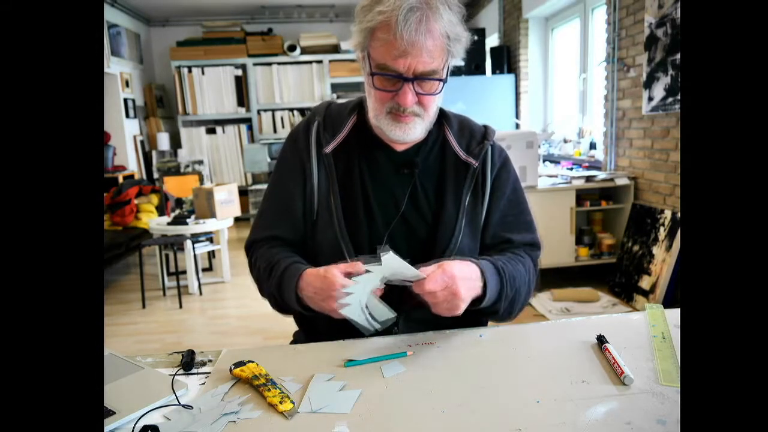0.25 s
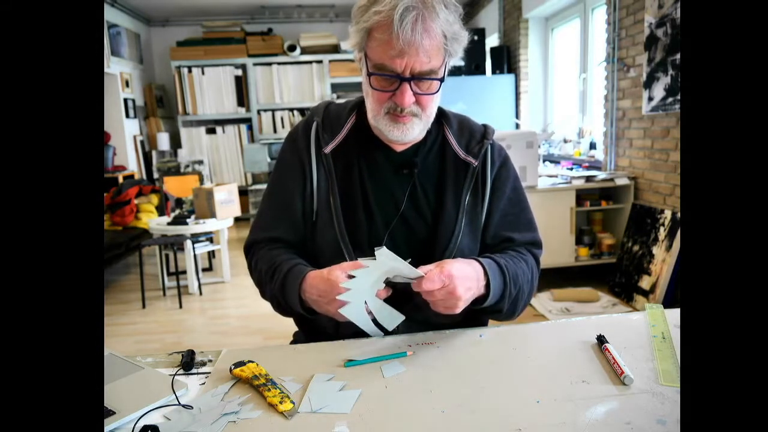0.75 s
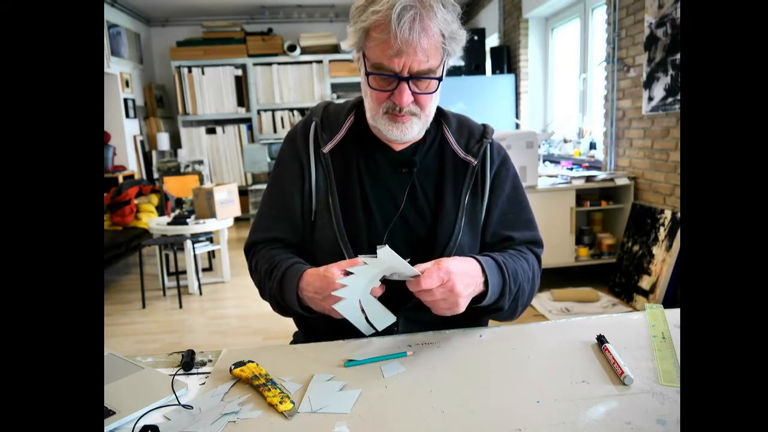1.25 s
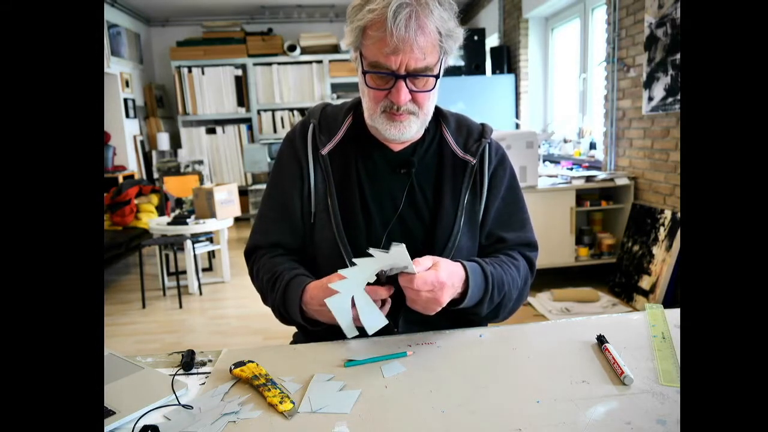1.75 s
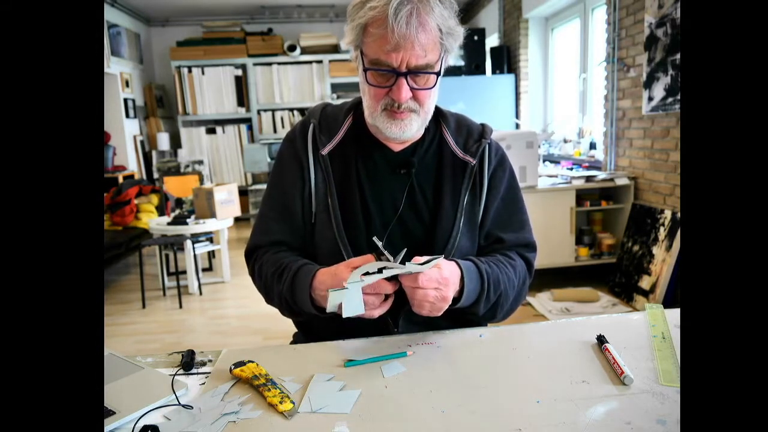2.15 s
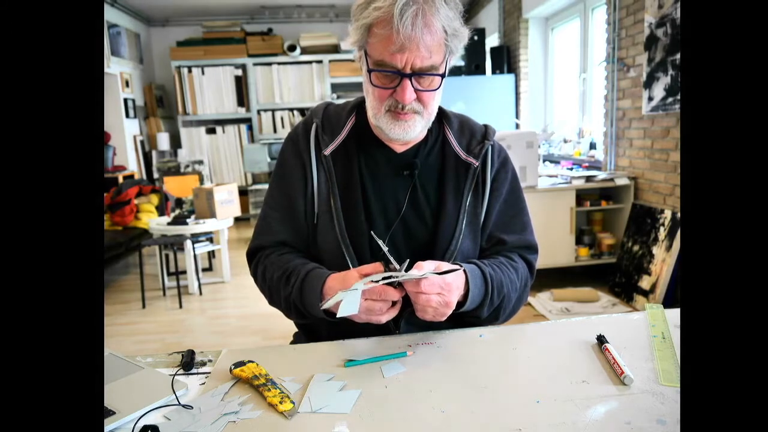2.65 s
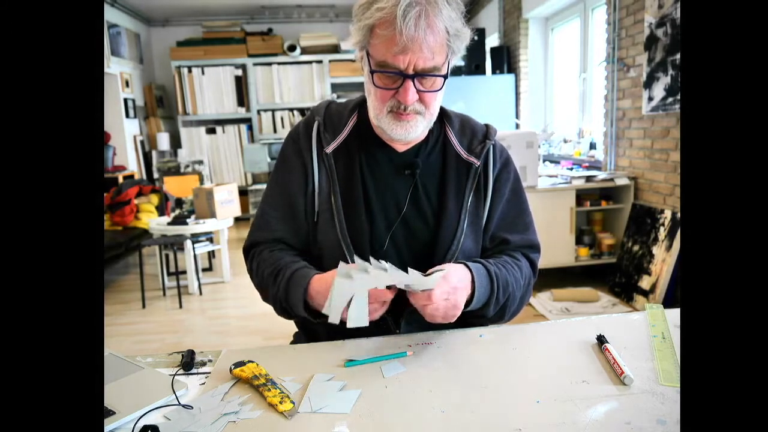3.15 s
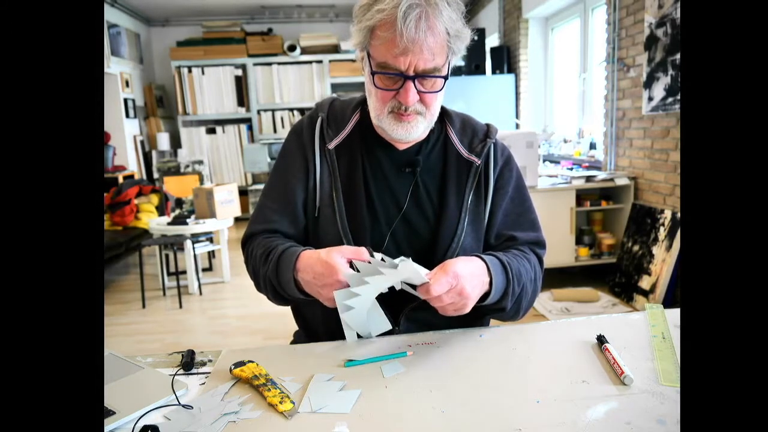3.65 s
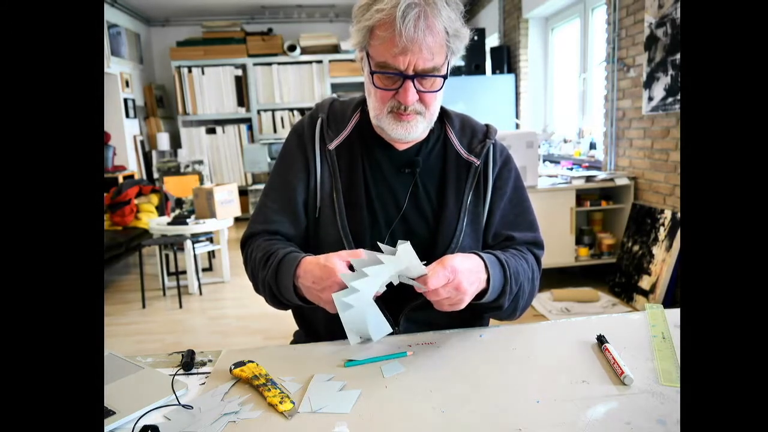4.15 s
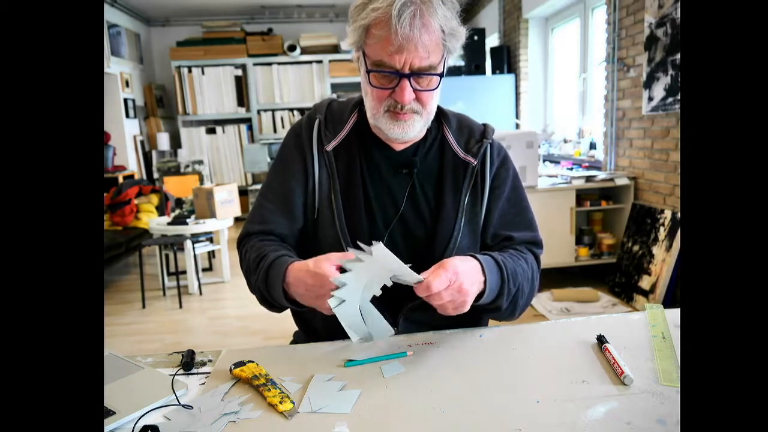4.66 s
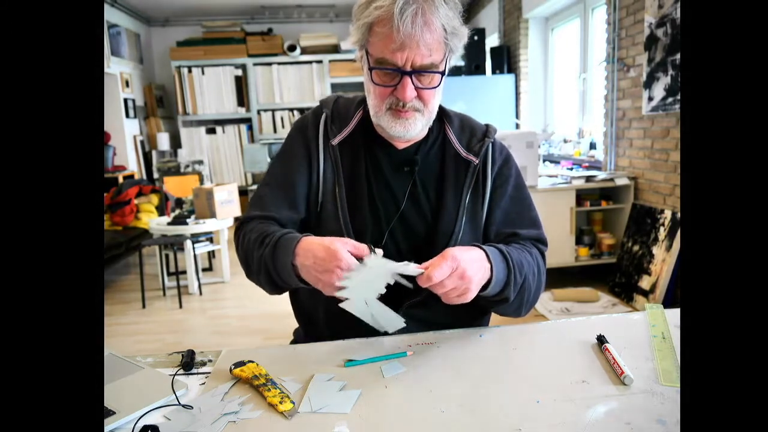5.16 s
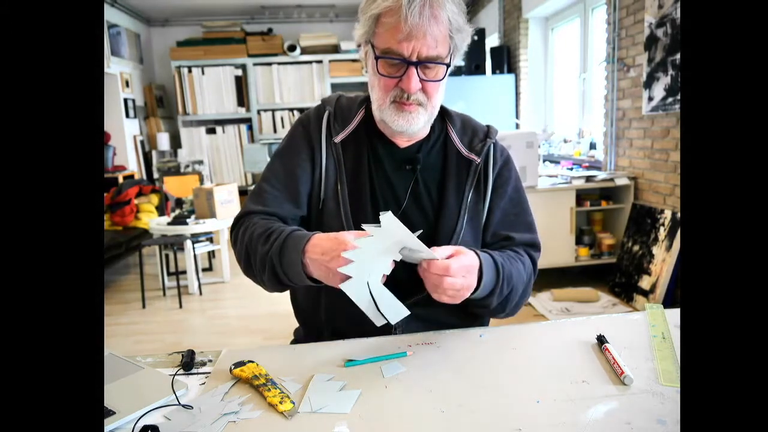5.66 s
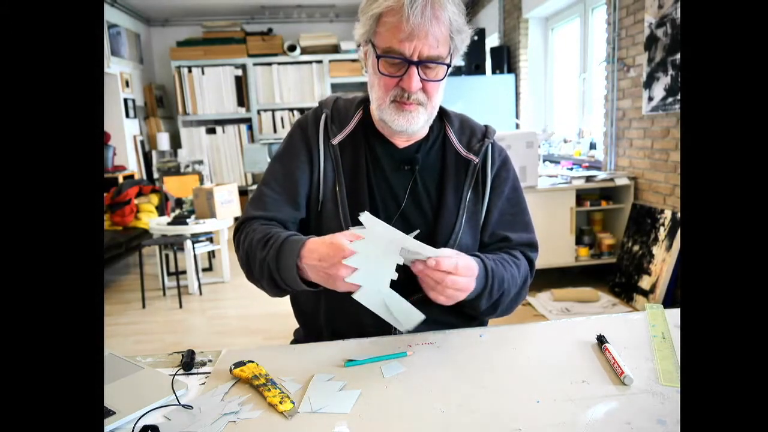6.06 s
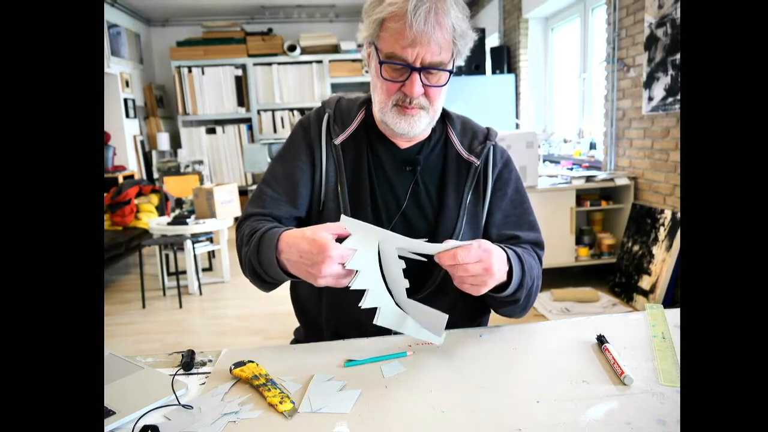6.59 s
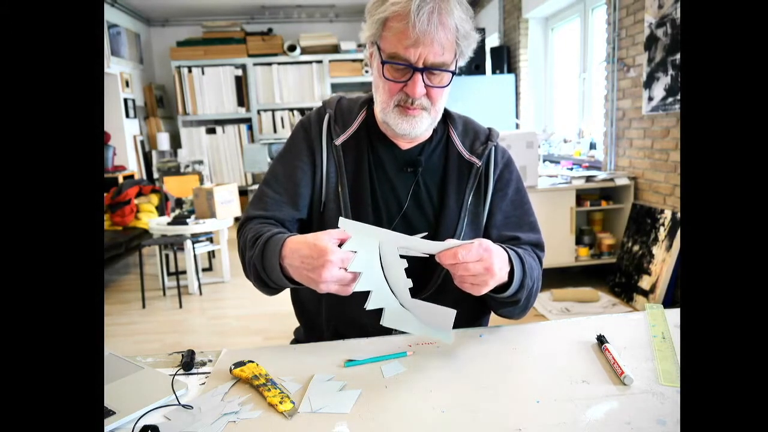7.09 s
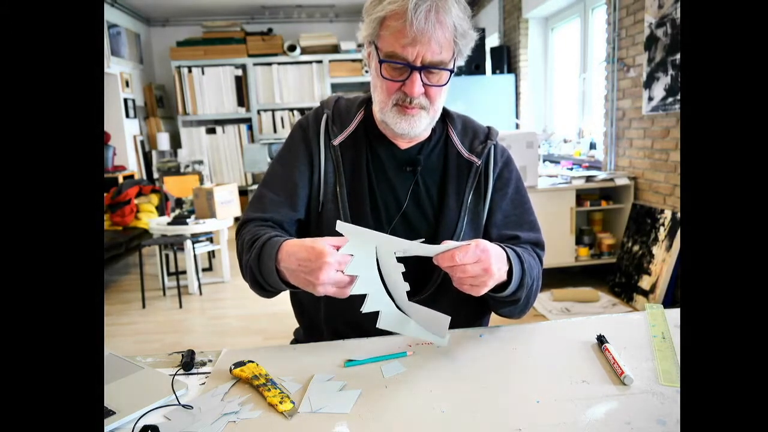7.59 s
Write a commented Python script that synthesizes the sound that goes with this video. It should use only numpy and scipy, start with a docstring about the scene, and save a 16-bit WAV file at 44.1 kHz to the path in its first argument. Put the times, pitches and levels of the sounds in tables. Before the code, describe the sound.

Stiff card rustles and scrapes as it is turned by hand, with short, crisp scissor cuts and light blade ticks.

```python
"""Scissors cut a folded sheet of stiff white card, close by, at a table in a quiet studio.
The blades crunch through in runs of small snaps: fibres fracture, and the freed sheet springs back
in its bending modes with a short hollow pock. Between the cuts the card is turned and slides through
the fingers in short strokes of stick-slip friction, and the blades tick together.
A faint, dull low noise swells and fades over the still air of the room."""
import sys
import numpy as np
from scipy import signal
from scipy.fft import rfft, irfft
from scipy.io import wavfile

SR = 44100
rng = np.random.default_rng(int(sys.argv[2]) if len(sys.argv) > 2 else 0)


def master_out(mix):
    """Clip the mix to full scale and print it as 16-bit PCM to the path in sys.argv[1]."""
    frames = np.transpose(np.atleast_2d(mix))
    ceiling = np.clip(frames, -1, 1)
    pcm = np.round(ceiling * 32767).astype(np.int16)
    wavfile.write(sys.argv[1], SR, pcm)


N = 345303


def amp(db):
    """Amplitude ratio of a level in decibels."""
    return 10 ** (np.asarray(db) / 20)


def unit(x):
    """Normalisation to an rms of 1."""
    return x / np.sqrt(np.mean(x ** 2) + 1e-20)


def at_level(x, db, span_s=.009):
    """Equal energy: a transient gets the energy of level db held for span_s."""
    return x * amp(db) * np.sqrt(span_s * SR / (np.sum(x ** 2) + 1e-20))


def spectrum_at(points, hz):
    """Interpolation on a logarithmic frequency axis."""
    knots_hz, values = np.transpose(points)
    return np.interp(np.log(hz + 1), np.log(knots_hz + 1), values)


def add(mix, start_s, sound):
    """Superposition of a sound on the mix."""
    part = mix[max(round(start_s * SR), 0):][:len(sound)]
    part += sound[:len(part)]


def resonance(hz, centre_hz, width_hz):
    """A Lorentzian peak of height 1."""
    return 1 / (1 + (2 * (hz - centre_hz) / width_hz) ** 2)


def coloured_noise(gain, size):
    """Spectral shaping of white noise, at an rms of 1."""
    return unit(irfft(rfft(rng.standard_normal(size)) * gain, size))


def minimum_phase(x, gain):
    """Causal filtering: the phase follows from the log gain by the Hilbert transform."""
    log_response = np.conj(signal.hilbert(np.log(gain + 1e-4)))
    return np.fft.ifft(np.fft.fft(x) * np.exp(log_response)).real


def waver(per_s):
    """Random modulation of rms 1, interpolated between per_s values a second."""
    knots = np.arange(0, N, SR / per_s)
    return unit(np.interp(np.arange(N), knots, rng.standard_normal(N)[:len(knots)]))


def fibres(size, per_s, spread_db):
    """Shot noise of fibres catching or breaking: many small impulses, a few large."""
    occurs = rng.random(size) < per_s / SR
    strength = rng.standard_normal(size)
    return occurs * strength * amp(spread_db * np.minimum(rng.exponential(1, size), 4))


# Spectrum of the still air. Each row: frequency in Hz, relative level in dB.
AIR_SPECTRUM = [(30, -24.5), (120, -4.5), (280, -1.5), (450, -7.5), (1000, -12), (2500, -16), (4500, -24.5),
                (7000, -24.5), (11000, -32), (15000, -49)]
def air(level_db=-75):
    """Stationary noise: the faint ambient sound of the room."""
    hz = np.fft.rfftfreq(N, 1 / SR)
    return amp(level_db) * coloured_noise(amp(spectrum_at(AIR_SPECTRUM, hz)), N)


# Reflections from the table and the body. Each row: delay in seconds, gain.
ECHOES = [(.0017, 0.28), (.0031, -0.18), (.0078, 0.072), (0.0107, -.11), (0.011, 0.054)]
# Decay of the studio. Each row: frequency in Hz, time to fall 60 dB in seconds.
STUDIO_T60 = [(150, 0.11), (900, 0.15), (4000, 0.11), (12000, 0.015)]
def studio(x, tail_db, build_s=0.11, size=16384):
    """Reverberation: early reflections, then a short weak tail whose treble is absorbed first."""
    hz, t, noise = signal.stft(rng.standard_normal(size), SR, nperseg=256)
    decay = amp(-60 * t / spectrum_at(STUDIO_T60, hz)[:, None])
    tail = signal.istft(noise * decay * (1 - np.exp(-t / build_s)), SR)[1]
    response = amp(tail_db) * tail / np.linalg.norm(tail)
    for delay, gain in ECHOES:
        add(response, delay, np.array([gain]))
    return x + signal.oaconvolve(x, response)[:N]


# Swells of the low murmur. Each row: time in seconds, level in dB.
MURMUR_LEVELS = [(0.0, -97), (0.5, -82), (0.67, -64.5), (1.59, -77), (1.79, -60.5), (2.22, -69.5),
                 (3.16, -58), (3.66, -70.5), (4.17, -58.5), (4.51, -72.5), (4.99, -64.5), (5.34, -65.5),
                 (5.76, -77), (6.1, -59), (6.76, -82), (7.24, -68.5), (7.59, -75), (7.83, -66)]
def low_murmur(centre_hz=290, width_hz=240):
    """Amplitude modulation of a noise band: a faint, dull low noise that swells and fades."""
    hz, t = np.fft.rfftfreq(N, 1 / SR), np.arange(N) / SR
    murmur = coloured_noise(resonance(hz, centre_hz, width_hz) * hz / (hz + centre_hz), N)
    return murmur * amp(np.interp(t, *np.transpose(MURMUR_LEVELS)))


# The smooth face of the card glides over skin.
# Each row: start and length in seconds, highest level in dB, pitch in Hz.
SWISHES = [(1.633, 0.34, -57, 10800), (3.911, 0.33, -59.5, 10800), (4.323, .1, -55, 10100),
           (4.603, 0.069, -58.5, 11500), (4.908, .12, -53, 10300), (5.409, 0.15, -56.5, 9800),
           (5.973, 0.4, -57, 10640)]
def swishes(width_hz=2000, arch=0.85):
    """Very fine slips excite one high resonance, whose amplitude follows the speed of the glide."""
    out, hz = np.zeros(N), np.fft.rfftfreq(SR, 1 / SR)
    for start, length, db, pitch_hz in SWISHES:
        slips = coloured_noise(resonance(hz, pitch_hz, width_hz) ** 2, SR)
        speed = np.abs(np.sin(np.pi * np.arange(0, length, 1 / SR) / length)) ** arch
        add(out, start, amp(db) * speed * slips[:len(speed)])
    return out


# Radiation of the sheet. Each row: frequency in Hz, relative level in dB.
CARD_SPECTRUM = [(40, -28), (150, -28), (320, 3.5), (500, -6), (900, -1), (1900, -0.5), (2900, -4.5),
                 (4900, 0), (6200, -10), (7200, 0.5), (8700, -3.5), (9800, 0.5), (11300, -0.5),
                 (12600, -11), (14400, -17.5), (15800, -34)]
# Narrow resonances of card and blades. Each row: centre and width in Hz, added peak's gain in dB.
RESONANCES = [(320, 22, 3.5), (396, 21, -14.5), (647, 70, 5), (907, 110, 2.5), (2006, 79, 2),
              (4170, 670, -11), (4900, 200, -13)]
# Edges in Hz of three bands: body, scrape and hiss in a rub; flex, crack and fizz in a snap.
BAND_EDGES_HZ = [35, 1900, 6000, 15500]
def card_bands(hz):
    """Frequency response of the sheet, split into three bands by Butterworth slopes."""
    peaks = sum(amp(db) * resonance(hz, centre, width) for centre, width, db in RESONANCES)
    colour = amp(spectrum_at(CARD_SPECTRUM, hz)) * (1 + peaks)
    return [colour / np.sqrt((1 + (low / (hz + 1)) ** 12) * (1 + (hz / high) ** 12))
            for low, high in zip(BAND_EDGES_HZ, BAND_EDGES_HZ[1:])]


# Faint rustle between the strokes. Each row: time in seconds, level in dB.
RUSTLE = [(0, -101), (.4, -77), (.7, -61.5), (1.1, -71.5), (1.45, -69), (1.9, -64.5), (2.15, -70.5),
          (2.8, -57.5), (3.4, -68.5), (3.8, -66), (4.2, -66.5), (4.45, -59.5), (5.15, -54.5), (5.45, -64.5),
          (5.8, -71.5), (6.3, -67.5), (6.85, -78), (7.1, -68), (7.83, -73.5)]
# Offsets of that level in dB for the body, scrape and hiss bands.
RUSTLE_BANDS_DB = (-1, -13, -16)
# Strokes of card on skin and steel. Each row: start, attack, hold and release in seconds,
# body, scrape and hiss levels in dB, body and scrape resonances in Hz.
STROKES = [(0.157, 0.0035, 0.058, 0.03, -51, -64, -63.5, 1237, 1970),
           (0.601, 0.0073, 0.054, 0.052, -42, -45.5, -46, 803, 4900),
           (1.155, 0.052, 0.0079, 0.02, -65.5, -59, -57.5, 620, 4760),
           (1.46, 0.04, 0.017, 0.043, -65, -52.5, -54.5, 2040, 4250),
           (1.608, .006, .04, .09, -49, -56.5, -50.5, 1096, 4300),
           (1.667, 0.054, .035, 0.12, -50, -56.5, -53.5, 1700, 2000),
           (1.903, 0.048, 0.044, 0.031, -45.5, -46.5, -52, 1530, 2378),
           (2.04, 0.0057, 0.0087, 0.027, -45, -48, -54.5, 1500, 2158),
           (2.174, 0.038, 0.0092, 0.045, -66.5, -64.5, -74, 900, 4330),
           (2.281, 0.033, 0.015, 0.012, -59, -59, -65, 890, 4430),
           (2.353, 0.073, 0.034, 0.034, -44, -49, -56, 999, 4365),
           (2.543, 0.0026, .12, .05, -56.5, -67.5, -64, 730, 3920),
           (2.84, 0.015, 0.0059, 0.022, -46, -47.5, -51, 597, 3760),
           (2.943, 0.064, 0.071, .1, -42, -44.5, -50, 1050, 4210),
           (3.185, .022, .038, 0.042, -32, -38.5, -48.5, 1149, 4700),
           (3.229, 0.021, 0.081, 0.069, -43, -46, -54, 515, 1958),
           (3.397, 0.047, 0.016, 0.057, -49.5, -49, -55, 872, 5024),
           (3.523, 0.1, 0.042, 0.062, -43.5, -44.5, -47.5, 1560, 3920),
           (3.849, 0.18, 0.12, .05, -66.5, -69.5, -66.5, 1000, 4390),
           (4.04, 0.0087, 0.18, 0.11, -51.5, -61.5, -59.5, 754, 2885),
           (4.27, .008, .025, .04, -67, -59.5, -67, 900, 4200),
           (4.325, 0.012, .035, .055, -58.5, -53.5, -51.5, 846, 4700),
           (4.391, .03, .012, 0.014, -56, -54, -63, 1100, 2900),
           (4.46, 0.0062, 0.096, 0.11, -69, -61, -71, 549, 5200),
           (4.617, 0.0067, 0.038, 0.03, -58, -58.5, -61.5, 1440, 4230),
           (4.687, 0.019, 0.057, 0.036, -54, -46, -47, 691, 5190),
           (4.77, 0.019, .06, 0.15, -45.5, -63.5, -68.5, 785, 1990),
           (4.878, 0.073, 0.026, 0.039, -45.5, -47, -53.5, 744, 4860),
           (5.206, 0.042, 0.059, .035, -52, -56.5, -61, 830, 4616),
           (5.416, 0.038, 0.039, 0.069, -62, -58, -51.5, 529, 5370),
           (5.557, 0.0039, 0.013, 0.079, -70.5, -52.5, -50, 867, 4150),
           (5.652, 0.065, 0.019, 0.029, -51, -52, -49, 1010, 3550),
           (5.851, 0.011, 0.12, 0.08, -59, -58, -58.5, 570, 4230),
           (5.953, 0.0082, 0.046, 0.19, -43.5, -48.5, -49.5, 522.6, 2530),
           (6.069, 0.07, 0.035, 0.052, -56, -56.5, -54.5, 1900, 2192),
           (6.214, 0.044, 0.077, 0.025, -49, -53, -54, 1235, 1960),
           (6.37, 0.015, 0.045, 0.04, -68, -65, -69, 1200, 3895),
           (6.455, 0.028, 0.0042, 0.046, -56.5, -57, -63, 1865, 2080),
           (6.79, 0.0045, 0.0037, 0.041, -56, -52, -54, 1842, 2334),
           (7.101, 0.00294, .032, .05, -55.5, -64, -60, 1500, 4320),
           (7.234, 0.026, 0.086, 0.086, -64.5, -86, -72.5, 1663, 4360),
           (7.592, .033, 0.0092, 0.071, -54, -56, -56, 1400, 5590),
           (7.661, .1, .015, 0.077, -49.5, -51.5, -49, 703, 4000),
           (7.736, .03, .014, .012, -48.5, -46, -46.5, 1500, 5200)]
def handling(hiss_hz=10300, attack_curve=0.94, release_db=-20):
    """Incoherent sources add in power: level and resonance of each band of rubbing over time."""
    t = np.arange(0, N / SR, .001)
    columns = np.transpose(STROKES)
    start, attack, hold, release = columns[:4, :, None]
    band_gains, pitches_hz = amp(columns[4:7]), columns[7:]
    rise = np.clip((t - start) / attack, 0, 1) ** attack_curve
    envelopes = rise * amp(release_db * np.maximum(t - start - attack - hold, 0) / release)
    rustle = amp(np.interp(t, *np.transpose(RUSTLE)) + np.array(RUSTLE_BANDS_DB)[:, None])
    levels = 10 * np.log10(band_gains ** 2 @ envelopes ** 2 + rustle ** 2)
    strongest = np.argmax(envelopes * band_gains[0][:, None], axis=0)
    body_hz, scrape_hz = pitches_hz[:, strongest]
    return t, levels, (body_hz, scrape_hz, np.full(len(t), hiss_hz))


# Treble dips where the curved sheet radiates poorly. Each row: centre and width in Hz.
DIPS = [(6150, 900), (8400, 900)]
# Their depth as the card is turned. Each row: time in seconds, depth in dB.
DIP_DEPTH = [(.6, 2), (1.5, 9), (1.64, -1), (1.95, 2.5), (2.42, 6.5), (3, -1.5), (3.45, 0), (4.1, 0),
             (4.38, 9.5), (4.72, -2), (4.96, 9.5), (5.48, 0), (5.72, 11), (6, -1), (6.8, 8.5), (7.7, 0.5)]
def sliding(bend_octaves=0.047, judder_db=2.12, patch_db=3.0, grip_db=1.0,
            grip_widths_hz=(500, 1000, 3000), brighten=(.08, .08, .3), neutral_db=-54, trim_db=.1):
    """Stick-slip friction under a juddering hand drives a sheet whose resonances drift as it bends."""
    times, levels, centres_hz = handling()
    t, out = np.arange(N) / SR, np.zeros(N)
    bend = 2 ** (bend_octaves * waver(per_s=14))
    judder = amp(judder_db * waver(per_s=89))
    smoothing = np.outer(np.hanning(9), np.hanning(21))
    for band, level in enumerate(levels):
        slips = fibres(N, per_s=14000, spread_db=2.5) * judder
        bins_hz, frame_s, spectra = signal.stft(slips, SR, nperseg=512)
        hz = bins_hz[:, None]
        # the timbre flickers in random patches of time and frequency
        patches = unit(signal.fftconvolve(rng.standard_normal(spectra.shape), smoothing, "same"))
        bent_hz = hz * np.interp(frame_s, t, bend)
        colour = np.interp(bent_hz, bins_hz, card_bands(bins_hz)[band])
        depth_db = np.interp(frame_s, *np.transpose(DIP_DEPTH))
        dips_db = depth_db * sum(resonance(hz, centre, width) for centre, width in DIPS)
        grip_hz = np.interp(frame_s, times, centres_hz[band])
        grip = 1 + amp(grip_db) * resonance(bent_hz, grip_hz, grip_widths_hz[band])
        # harder rubbing makes shorter slips, so the spectrum tilts up
        db_per_octave = brighten[band] * (np.interp(frame_s, times, level) - neutral_db)
        tilt_db = db_per_octave * np.log2(np.maximum(hz, 200))
        gain = colour * grip * amp(patch_db * patches - dips_db + tilt_db)
        rub = signal.istft(spectra * gain / np.linalg.norm(gain, axis=0), SR)[1][:N]
        out += unit(rub) * amp(np.interp(t, times, level) + trim_db)
    return out


# The sheet fans the air as it swings free. Each row: start in seconds, level in dB over 9 ms.
PUFFS = [(.162, -59), (1.619, -60), (1.925, -62), (3.229, -52), (4.745, -56)]
def puffs(push_s=.0018, size=2048):
    """Pressure follows the acceleration of displaced air: one push and pull is a deep, toneless thud."""
    u, out = np.arange(size) / SR / push_s, np.zeros(N)
    displacement = u ** 3 * np.exp(-u)
    pressure = np.gradient(np.gradient(displacement))
    for start, db in PUFFS:
        add(out, start, at_level(pressure, db))
    return out


# The hand jolts the sheet as it gives way. Each row: start in seconds, level in dB over 9 ms.
THUMPS = [(1.6166, -48), (1.925, -48.5), (2.5418, -48.5), (2.659, -56), (2.851, -46.5), (3.2073, -41),
          (3.2299, -34), (3.243, -37), (3.254, -41), (3.69, -43), (4.046, -51.5), (4.7422, -41.5),
          (5.333, -48.5), (5.5528, -43), (5.906, -44.5), (7.7724, -45.5)]
def thumps(pitch_hz=300, t60_s=0.012, rise_s=0.0035, size=2048):
    """Heavily damped oscillation: the whole sheet swings in the hand with a soft low knock."""
    t, out = np.arange(size) / SR, np.zeros(N)
    swing = np.sin(2 * np.pi * pitch_hz * t) * amp(-60 * t / t60_s) * (1 - np.exp(-t / rise_s))
    for start, db in THUMPS:
        add(out, start, at_level(np.gradient(swing), db))
    return out


# Modes of the steel. Each row: frequency in Hz, relative level in dB, time to fall 60 dB in seconds.
BLADE_MODES = [(1740, -4, 0.0089), (1990, 6.5, 0.024), (3610, -13.5, 0.011), (4930, -1.5, 0.013),
               (7300, -9.5, 0.018), (8000, -22, 0.069), (9800, 2, 0.0094)]
# Light knocks of blade on blade. Each row: start in seconds, level in dB over 9 ms.
BLADE_TICKS = [(1.0086, -77), (6.7941, -53.5), (7.026, -46), (7.254, -61), (7.589, -52.5)]
def blade_ticks(rise_s=0.00039, size=4096):
    """An impact excites the normal modes of the blades, which the hand soon damps."""
    t, out = np.arange(size) / SR, np.zeros(N)
    for start, db in BLADE_TICKS:
        phases = 2 * np.pi * rng.random(len(BLADE_MODES))
        ring = sum(amp(level - 60 * t / t60) * np.sin(2 * np.pi * hz * t + phase)
                   for (hz, level, t60), phase in zip(BLADE_MODES, phases))
        add(out, start, at_level(ring * (1 - np.exp(-t / rise_s)), db))
    return out


def creaks(count=14, flex_hz=950, crack_hz=4300, octaves=0.41, tear_s=0.00034, offsets_db=(-5, -3, -2)):
    """Bending stress makes small creaks: snap rows at random times, a little under the rubbing."""
    t, levels, _ = handling()
    moments = (rng.random(count) * len(t)).astype(int)
    pitches = flex_hz * 2 ** (octaves * rng.standard_normal(count))
    return [(t[i], hz, crack_hz, tear_s, *(levels[:, i] + offsets_db))
            for i, hz in zip(moments, pitches)]


# Bites of the blades. Each row: first and last time in seconds, number of snaps,
# first flex, last flex and crack pitches in Hz, flex, crack and fizz levels in dB.
CRUNCHES = [(0.185, 0.21, 3, 920, 900, 2090, -44, -54.5, -63),
            (1.572, 1.595, 3, 1180, 1060, 2800, -46.5, -53.5, -57),
            (2.571, 2.621, 3, 720, 925, 3920, -45.5, -49.5, -50),
            (4.048, 4.102, 3, 1330, 1137, 2720, -43.5, -47, -52.5)]
def crunches(tear_s=0.002, jitter_s=0.00079, spread_db=1):
    """Stepwise fracture: nearly evenly spaced snap rows whose pitch glides as the cut advances."""
    rows = []
    for first, last, count, first_hz, last_hz, crack_hz, *levels in CRUNCHES:
        for along in np.linspace(0, 1, round(count)):
            scatter = rng.standard_normal(4)
            start = first + along * (last - first) + jitter_s * scatter[0]
            flex_hz = first_hz + along * (last_hz - first_hz)
            rows.append((start, flex_hz, crack_hz, tear_s, *(levels + spread_db * scatter[1:])))
    return rows


def tearing_fibres(t, tear_s, brittle_s=0.00049, break_gain=2.4):
    """Fracture of a fibre bundle: the quicker the tear, the more of it is one clean first break."""
    u = t / tear_s
    swell = fibres(len(u), per_s=40000, spread_db=0.6) * (1 - np.exp(-1.5 * u)) * np.exp(-.5 * u)
    impulse = signal.unit_impulse(len(u), np.argmax(u > .5))
    first_break = break_gain * np.exp(-tear_s / brittle_s) * impulse
    return swell / (np.linalg.norm(swell) + 1e-12) + first_break


def spot_colour(hz, spacing_hz=450, ripple_db=4.5):
    """The point of excitation weights the sheet's modes: a random ripple over frequency."""
    knots_hz = np.arange(0, SR / 2, spacing_hz)
    return amp(ripple_db * np.interp(hz, knots_hz, rng.standard_normal(len(knots_hz))))


# Bending modes of the held sheet. Each row: multiple of the flex pitch,
# relative level of the motion in dB, time to fall 60 dB in seconds.
FLEX_MODES = [(0.358, -5, 0.025), (0.538, -9, 0.018), (0.781, -4.5, 0.033), (1.009, 15, 0.01),
              (1.33, -9.5, .011), (1.748, -20, .009)]
# Single snaps of the card. Each row: start in seconds, flex and crack pitches in Hz,
# tearing time in seconds, flex, crack and fizz levels in dB over 9 ms.
SNAPS = [(.1598, 1270, 3800, .0016, -40, -46, -46), (.1625, 933, 1960, 0.00081, -29, -37, -47.5),
         (.2168, 866, 2090, 0.00071, -38, -50.5, -58), (.3099, 870, 2080, 0.0014, -54, -80, -82),
         (.324, 960, 2100, 0.0016, -55.5, -76, -80), (.6275, 820, 2050, 0.0022, -35.5, -63, -58),
         (1.0086, 665, 2160, 0.0017, -68, -67.5, -67), (1.0955, 756, 2100, 0.0015, -41, -53, -60),
         (1.3217, 740, 4570, 0.0013, -59, -62, -57), (1.3469, 1390, 2100, 0.0053, -53.5, -65, -62),
         (1.3774, 800, 4500, 0.00069, -58, -65, -55.5), (1.3913, 650, 2080, 0.0022, -52, -76, -70),
         (1.6167, 866, 2040, 0.00084, -34, -39, -46), (1.9916, 1420, 4350, 0.002, -41, -40.5, -50),
         (2.0105, 900, 2100, 0.00066, -45.5, -58, -68), (2.0735, 1090, 2200, .0006, -52, -57, -69),
         (2.5395, 696, 4160, 0.0023, -40, -41, -40.5), (2.658, 1000, 4300, 0.00083, -45, -47.5, -50),
         (2.8194, 728, 4000, 0.0024, -52, -56.5, -54), (3.1567, 1330, 4074, 0.0043, -39.5, -41, -46.5),
         (3.169, 1400, 2090, 0.00059, -38, -52, -62), (3.1858, 1400, 5300, 0.00043, -35.5, -22, -34.5),
         (3.1938, 750, 4300, 0.00083, -35, -36, -44), (3.2075, 1390, 4700, .0005, -36, -42, -50),
         (3.2123, 1470, 2100, 0.00035, -31.5, -46, -49), (3.2283, 1360, 4200, 0.00047, -19, -21.5, -34),
         (3.2305, 790, 2100, 0.00077, -26.5, -37, -45), (3.2392, 1100, 4300, .001, -32, -45, -52),
         (3.6904, 823, 2190, 0.0026, -34.5, -42.5, -56), (3.8337, 856, 4240, 0.0047, -65, -58, -60.5),
         (3.8615, 1310, 4730, 0.0029, -65, -56, -63), (3.894, 1040, 4420, 0.0011, -59.5, -54.5, -79),
         (4.125, 900, 4000, .0012, -43.5, -52, -58), (4.137, 1190, 4000, 0.0018, -40.5, -50, -51),
         (4.147, 1000, 3900, .0015, -41, -50, -58), (4.172, 790, 2100, 0.00089, -38.5, -52, -65),
         (4.181, 775, 2100, 0.0014, -39.5, -49, -55), (4.2148, 754, 2100, 0.0023, -35, -49, -49.5),
         (4.2303, 705, 2100, 0.00096, -54, -53, -59), (4.2577, 920, 4270, 0.00032, -36, -37, -42),
         (4.2695, 680, 4600, 0.0016, -39.5, -47, -62), (4.7424, 697, 5160, 0.0009, -35.5, -38, -38),
         (4.7672, 1400, 2100, 0.00098, -36, -39, -50), (4.833, 1150, 2100, 0.0014, -41, -49.5, -57),
         (4.8895, 744, 2080, 0.00067, -47, -62, -48.5), (5.3327, 1360, 2100, 0.0012, -43.5, -55, -71),
         (5.358, 900, 2120, 0.0006, -45.5, -54, -86), (5.5528, 656, 2100, 0.00079, -30.5, -54, -69),
         (5.962, 1194, 2270, 0.00049, -26.5, -36, -66), (7.1043, 1440, 2100, 0.0011, -45.5, -49, -46),
         (7.255, 1230, 2070, 0.0014, -53.5, -50, -49.5), (7.2732, 840, 4700, 0.0019, -49, -54, -55.5),
         (7.33, 523, 2100, 0.0013, -44.5, -51, -48.5), (7.3756, 800, 5750, 0.00074, -64.5, -63, -57.5),
         (7.589, 1700, 2060, 0.00079, -50, -49, -67.5), (7.6157, 1680, 4540, 0.0015, -53, -51.5, -45),
         (7.6225, 1430, 2080, .0007, -51, -53, -46), (7.6727, 1155, 2180, 0.00051, -41, -54, -42),
         (7.7712, 800, 4780, 0.00085, -57, -49, -43.5)]
def snaps(rows, ragged=0.85, hollow_db=15.0, hollow_width_hz=700, focus_db=2.0, focus_width_hz=1600,
          fall=0.74, size=2048):
    """Fracture releases elastic energy: fibres tear, and the freed sheet rings in its bending modes."""
    t, out = np.arange(size) / SR, np.zeros(N)
    hz = np.abs(np.fft.fftfreq(size, 1 / SR))
    flex_band, crack_band, fizz_band = card_bands(hz)
    fizz_octaves = np.log2(np.maximum(hz / BAND_EDGES_HZ[2], 1))
    for start, flex_hz, crack_hz, tear_s, flex_db, crack_db, fizz_db in rows:
        flex_tear, crack_tear, fizz_tear = [tearing_fibres(t, tear_s) for _ in range(3)]
        let_go = 1 - np.exp(-t / tear_s)
        ring = sum(amp(db - 60 * t / t60) * np.sin(2 * np.pi * flex_hz * ratio * t)
                   for ratio, db, t60 in FLEX_MODES)
        # the tearing rings most near the pitch of the flap that it frees
        hollow = flex_band * (1 + amp(hollow_db) * resonance(hz, flex_hz, hollow_width_hz))
        spot = spot_colour(hz)
        focus = 1 + amp(focus_db) * resonance(hz, crack_hz, focus_width_hz)
        # where the crack outweighs the fizz, the top octave falls away steeply
        db_per_octave = fall * np.clip(fizz_db - crack_db, -15, 3)
        # the air follows the sheet's change of motion, so a flex has little deep bass
        flex = unit(np.gradient(ring * let_go)) + ragged * unit(minimum_phase(flex_tear, hollow))
        crack = minimum_phase(crack_tear, crack_band * np.sqrt(spot) * focus)
        fizz = minimum_phase(fizz_tear, fizz_band * spot * amp(db_per_octave * fizz_octaves))
        add(out, start, at_level(flex, flex_db) + at_level(crack, crack_db) + at_level(fizz, fizz_db))
    return out


def scene():
    """Superposition of rubbing and cutting, each with weak reverberation, over the air of the room."""
    rubbing = studio(sliding() + swishes() + low_murmur(), tail_db=-19)
    ambience = air()
    cutting = blade_ticks() + snaps(SNAPS + creaks() + crunches()) + thumps() + puffs()
    return (ambience + rubbing + studio(cutting, tail_db=-22.5))[None]


def record(dry):
    """Band limiting: a linear-phase low-pass filter at 15.9 kHz."""
    low_pass = signal.firwin(255, 15900, window=("kaiser", 8), fs=SR)
    return signal.oaconvolve(dry, low_pass[None], "same")


dry = scene()
out = record(dry)
master_out(out)
```